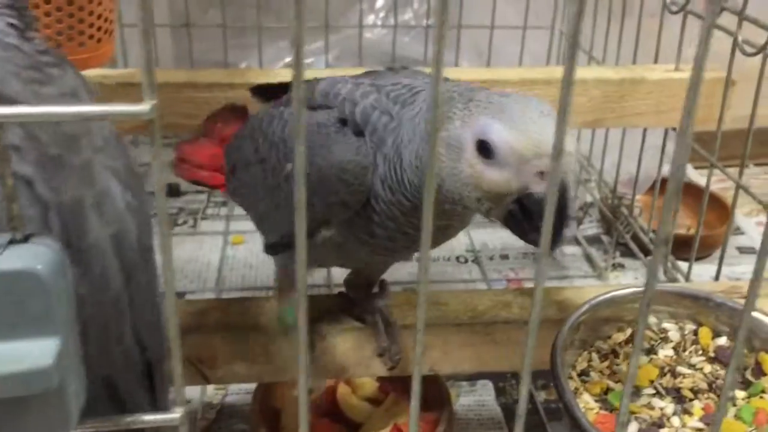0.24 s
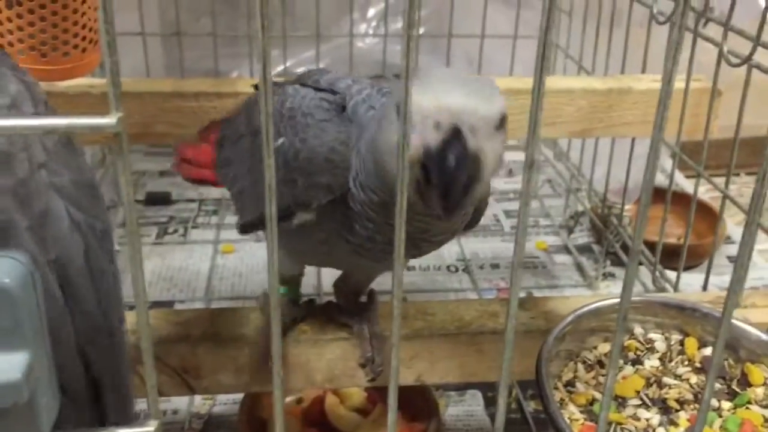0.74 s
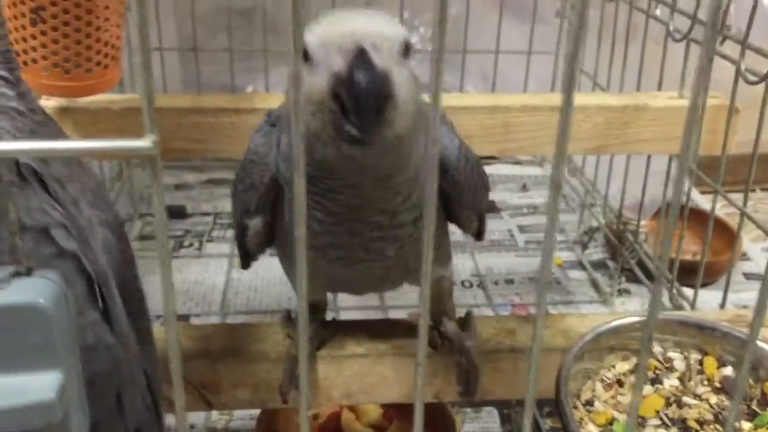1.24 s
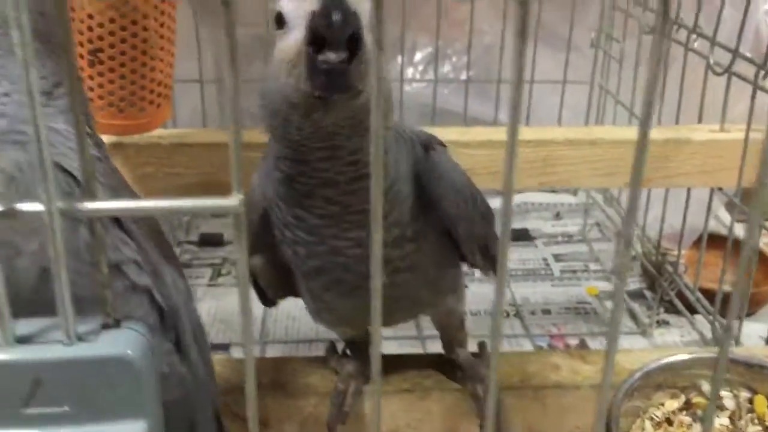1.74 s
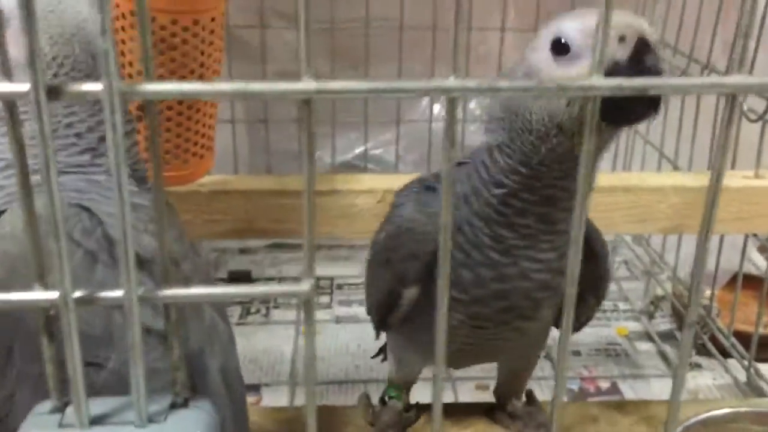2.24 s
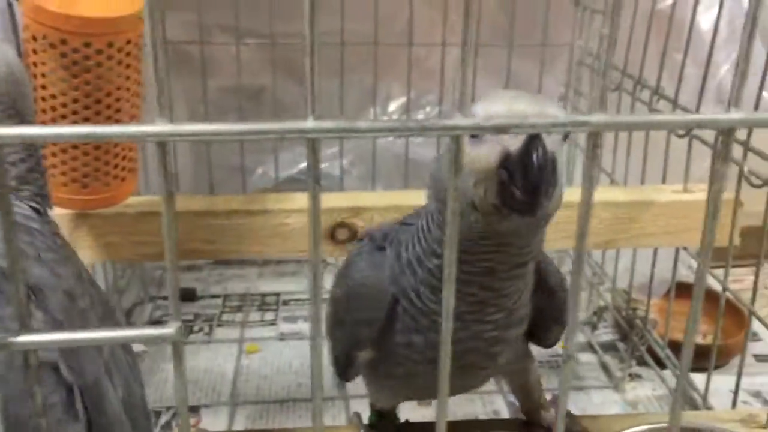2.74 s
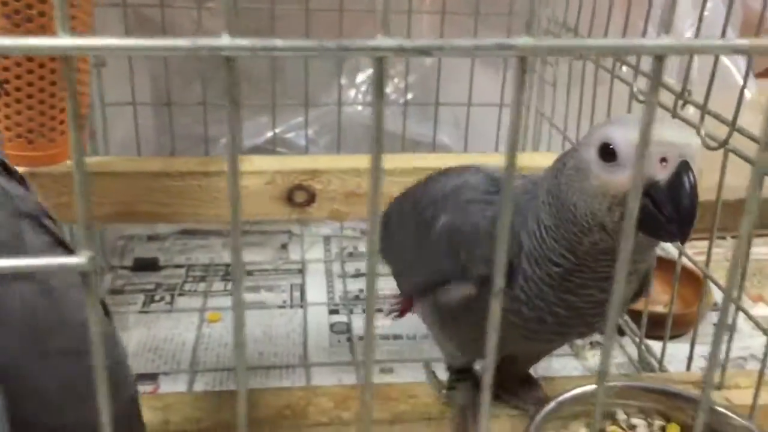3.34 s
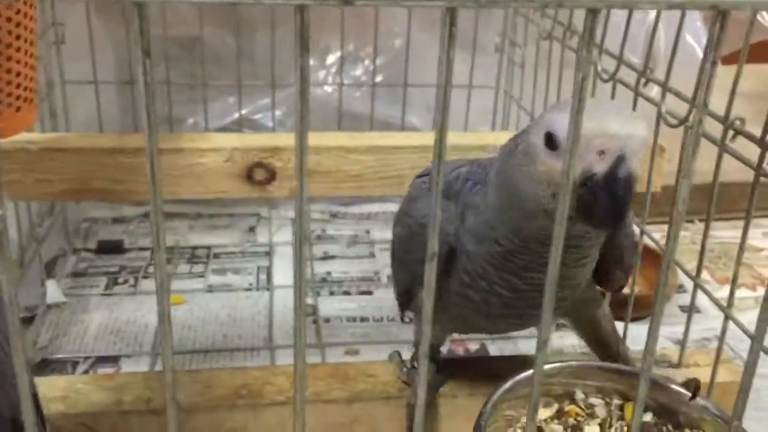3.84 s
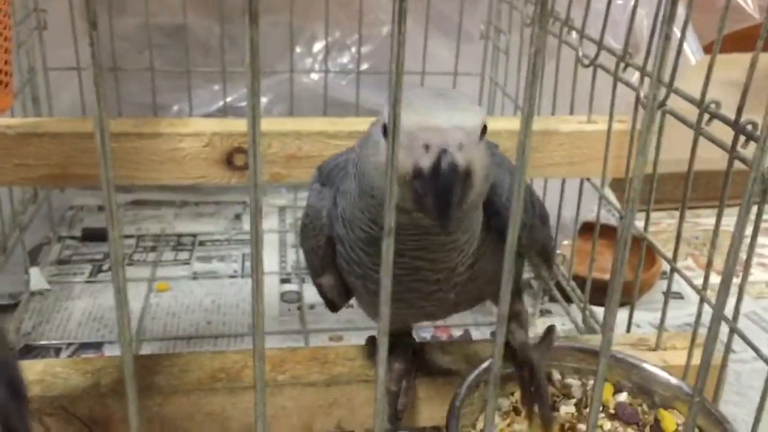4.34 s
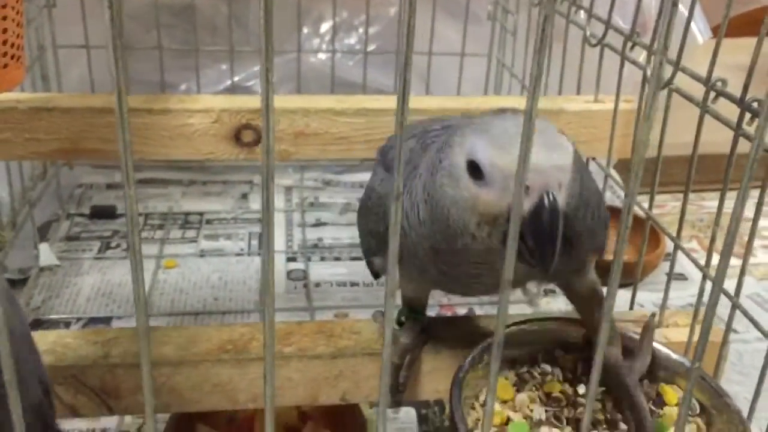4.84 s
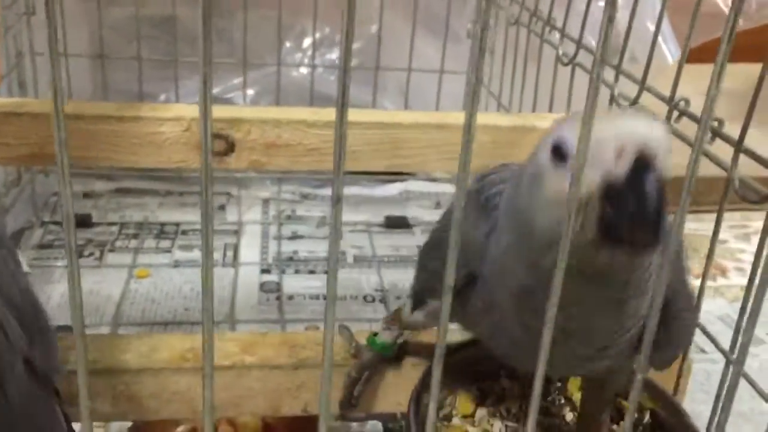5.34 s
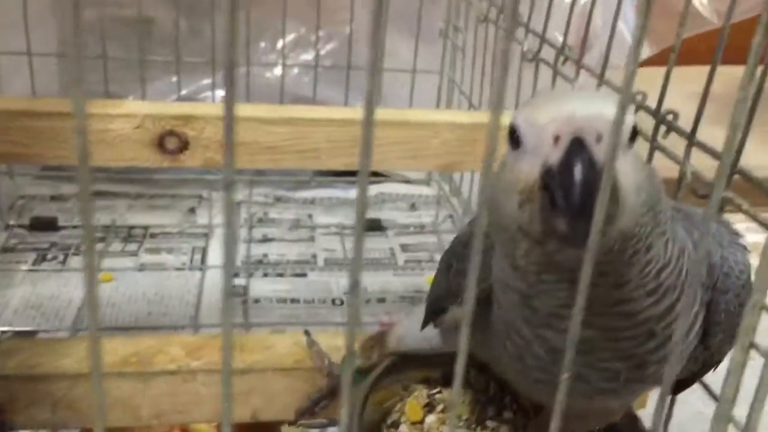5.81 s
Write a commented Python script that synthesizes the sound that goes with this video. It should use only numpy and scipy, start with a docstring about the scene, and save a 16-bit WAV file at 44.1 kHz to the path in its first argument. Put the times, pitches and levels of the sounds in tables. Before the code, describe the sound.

Parrots clamber about a wire cage, close to the microphone in a small room. Beaks and claws tap and scrape the bars irregularly, with a brief wire twang early on and soft thuds of feet on a wooden perch. Midway, one bird gives a short falling chirp. Sharper clicks follow, then a clink on a steel seed bowl, a few dull knocks very near and some squeaky scratching.

```python
"""Young parrots clamber about a wire cage, close by in a small room.
Beaks and claws excite the bars by impact (taps) and by stick-slip friction (scrapes, squeaks, twangs).
Feet thud on a wooden perch and clink a steel seed bowl; a few dull knocks land very near.
One bird gives a short falling chirp, a harmonic source shaped by the resonances of its throat.
The room adds a brief reverberation over a low rumble and faint hiss."""
import sys
import numpy as np
from scipy import signal
from scipy.fft import rfft, irfft, next_fast_len
from scipy.io import wavfile
from scipy.ndimage import uniform_filter1d

SR = 44100
rng = np.random.default_rng(int(sys.argv[2]) if len(sys.argv) > 2 else 0)


def master(y):
    """Save y as 16-bit WAV."""
    cut = np.clip(np.atleast_2d(y).T, -1, 1)
    pcm = np.round(cut * 32767)  # scale
    wavfile.write(sys.argv[1], SR, pcm.astype(np.int16))


N = 267687
TIME = np.arange(N) / SR
AGE = TIME[:32768]  # seconds since the onset of one event


def undb(db):
    """Decibels to amplitude ratio."""
    return 10 ** (np.asarray(db) / 20)


def unit_rms(x):
    """Normalise to rms 1."""
    return x / np.sqrt(np.mean(x ** 2))


def unit_energy(x):
    """Normalise to total energy 1."""
    return x / np.linalg.norm(x)


def at_level(x, level_db):
    """Set the rms level of the loudest three milliseconds."""
    return x * undb(level_db) / np.sqrt(uniform_filter1d(x ** 2, 132, mode="constant").max())


def add(out, start_s, x):
    """Superposition: sum a sound into the mix at its onset."""
    i = max(int(start_s * SR), 0)
    out[i:i + len(x)] += x[:N - i]


def decay(t60_s):
    """Exponential damping: 60 dB down after t60_s."""
    return np.exp(-np.log(1000) * AGE / max(t60_s, 1 / SR))


def colour(x, points):
    """Minimum-phase filter through (frequency_hz, gain_db) points, by folding the cepstrum."""
    hz, db = np.transpose(points)
    n = 2 * next_fast_len(len(x))
    f = np.maximum(np.fft.rfftfreq(n, 1 / SR), 1)
    cepstrum = irfft(np.log(undb(np.interp(np.log(f), np.log(hz), db))))
    cepstrum[1:n // 2] *= 2
    cepstrum[n // 2 + 1:] = 0
    return irfft(rfft(x, n) * np.exp(rfft(cepstrum)))[:len(x)]


def resonate(x, hz, q):
    """Second-order resonance of bandwidth hz / q."""
    return signal.lfilter(*signal.iirpeak(hz, q, fs=SR), x)


def ring(modes, scatter_db):
    """Free vibration as a sum of damped modes; each contact point weights them differently."""
    return sum(undb(db + scatter_db * rng.standard_normal()) * decay(t60_s)
               * np.sin(2 * np.pi * (hz * AGE + rng.random())) for hz, db, t60_s in modes)


def impact(t60_s, rattle):
    """Impulsive excitation followed by a dense, decaying rattle."""
    return (AGE == 0) + rattle * unit_energy(rng.standard_normal(len(AGE)) * decay(t60_s))


def chatter(t60_s, rattle, onset_t60_s):
    """Two-stage decay: a hard contact chatters briefly, then the bars rattle on."""
    first, after = rng.standard_normal((2, len(AGE)))
    return unit_energy(first * decay(onset_t60_s)) + rattle * unit_energy(after * decay(t60_s))


def stroke(length_s, attack_s):
    """Contact pressure of a slide: grip, easing off, release."""
    return (1 - np.exp(-(AGE / attack_s) ** 2)) * np.exp(-(AGE / length_s) ** 2)


def disperse(x, lag_s):
    """Dispersion of bending waves: the highs arrive first; lag_s is the group delay at 1 kHz."""
    f = np.fft.rfftfreq(2 * len(x), 1 / SR)
    phase = 4 * np.pi * lag_s * np.sqrt(1000 * f)
    return irfft(rfft(x, 2 * len(x)) * np.exp(-1j * phase))[:len(x)]


def tilt(hardness_db):
    """Spectral tilt (bass_db, treble_db): harder contacts trade bass for treble."""
    return 1.5 - hardness_db, hardness_db


def radiate(x, bass_db, treble_db):
    """Radiation efficiency: thin wire gives off little bass."""
    return colour(x, [(100, bass_db - 16), (400, bass_db - 22), (800, bass_db - 10),
                      (1250, bass_db + 0.5), (1900, bass_db / 2), (2700, 0), (4500, 0.0048),
                      (8500, treble_db + 2.5), (14500, 1.54 * treble_db - 4)])


# background noise spectrum: frequency_hz, relative_density_db
AIR_SPECTRUM = [(25, -34), (38, -16), (56, 2.5), (76, -9.5), (100, -2.5), (140, -10), (200, -15.5),
                (400, -24.5), (900, -27), (2500, -30.5), (7000, -35), (15500, -40)]
def air():
    """Steady broadband noise: the low rumble of the house and a faint hiss."""
    return unit_rms(colour(rng.standard_normal(N), AIR_SPECTRUM)) * undb(-65.5)


# modes of the free cage bars: frequency_hz, gain_db, t60_s
BAR_MODES = [(1310, -8.5, 0.35), (1522, -5, 0.11), (1861, -12.5, 0.075), (2426, -2, 0.17), (2910, -7, 0.11),
             (3670, 4, 0.1), (4100, 7, 0.028), (4530, -8, 0.085), (5610, 4, 0.073), (6740, 9, 0.019),
             (8350, -19, 0.11), (8810, 3.5, 0.055), (9930, -19.5, 0.14), (12200, 2.5, 0.15),
             (13700, -14.5, .09)]
def with_bar_ring(x, ring_db, scatter_db, grip_t60_s):
    """Modal response: a contact plus the ringing it excites, damped by the bird's grip."""
    response = ring(BAR_MODES, scatter_db) * decay(grip_t60_s)
    ringing = signal.fftconvolve(x, response)[:len(x)]
    return x + undb(ring_db) * np.linalg.norm(x) * unit_energy(ringing)


# claws and beaks sliding on wire and wood: start_s, length_s, level_db, hardness_db
SCRAPES = [(.002, 0.0083, -47, -1.5), (0.311, 0.029, -64, -2.5), (.622, 0.04, -50.5, -3.5),
           (0.852, 0.058, -38, -0.5), (.936, 0.03, -43, 8.5), (1.1, .12, -43.5, -5.5),
           (1.382, 0.11, -52.5, -3.5), (1.453, 0.054, -41.5, -11.5), (1.76, 0.019, -55.5, -0.5),
           (2.046, 0.012, -64.5, 1), (2.573, 0.023, -48.5, -6), (2.624, 0.025, -48, -0.5),
           (2.766, .028, -49, 2), (3.309, 0.044, -52.5, -7), (3.33, 0.031, -46, -2.5),
           (3.385, 0.041, -39, -3), (3.472, 0.038, -44.5, 0.5), (3.652, 0.017, -43.5, 4),
           (4.132, 0.028, -52, -2.5), (4.417, 0.08, -48, 0.5), (4.477, 0.012, -44, 4.5),
           (4.885, .11, -50.5, -16), (5.029, 0.042, -42.5, -1), (5.093, 0.26, -48, -2.5),
           (5.2152, 0.027, -36, -0.5), (5.499, 0.017, -49.5, -4), (5.514, 0.065, -45, -3),
           (5.556, 0.3, -53.5, -5.5), (5.712, 0.03, -43, 1.5), (5.7383, 0.057, -34.5, 1.5),
           (5.854, 0.065, -45, -1), (5.886, 0.034, -41, 1.5)]
def scrapes(slips_per_s=6000, slip_scatter_db=4, jerks_per_s=130, jerk_db=3):
    """Stick-slip friction: a claw moves in jerks, its tiny slips exciting the spot beneath it."""
    out = np.zeros(N)
    for start_s, length_s, level_db, hardness_db in SCRAPES:
        attack_s = 0.0024 * 2 ** ((-43.5 - level_db) / 12)  # firmer slides bite faster
        bass_db, treble_db = tilt(hardness_db)
        push, spread = rng.standard_normal((2, len(AGE)))
        slips = (rng.random(len(AGE)) < slips_per_s / SR) * push * undb(slip_scatter_db * spread)
        spot = impact(0.008, rattle=0.6)
        jerks = unit_rms(uniform_filter1d(rng.standard_normal(len(AGE)), int(SR / jerks_per_s)))
        force = slips * undb(jerk_db * jerks) * stroke(length_s, attack_s)
        friction = signal.fftconvolve(force, spot)[:len(AGE)]
        vibration = with_bar_ring(friction, ring_db=-12, scatter_db=2, grip_t60_s=0.035)
        # the wooden perch answers mainly the duller slides
        wood = undb(-17 + bass_db - treble_db) * resonate(vibration, 620, q=0.18)
        add(out, start_s, at_level(radiate(vibration, bass_db, treble_db) + wood, level_db))
    return out


def claw_ticks(ticks_per_s, loudest_db):
    """Faint impacts at random times as the birds shift their weight."""
    out = np.zeros(N)
    for when, faintness in rng.random((int(ticks_per_s * N / SR), 2)):
        tick = radiate(chatter(0.04, rattle=1.5, onset_t60_s=0.008), bass_db=-4, treble_db=-2)
        add(out, when * N / SR, at_level(tick, loudest_db - 9 * faintness))
    return out


# claws squeaking on wire: start_s, length_s, level_db, pitch_hz
SQUEAKS = [(0.324, 0.021, -61.5, 3340), (1.396, 0.045, -65, 3900), (1.397, 0.029, -54, 5600),
           (2.775, 0.021, -46.5, 4100), (2.777, 0.02, -44.5, 5600), (3.6343, 0.0065, -35, 8950),
           (4.087, .012, -59, 1700), (5.515, 0.013, -48, 6800), (5.73, .03, -40, 6800),
           (5.856, 0.07, -47.5, 2140)]
def squeaks():
    """Friction-excited resonance: the slips lock onto one frequency for a moment."""
    out = np.zeros(N)
    for start_s, length_s, level_db, pitch_hz in SQUEAKS:
        friction = rng.standard_normal(len(AGE)) * stroke(length_s, attack_s=length_s / 3)
        squeak = resonate(resonate(friction, pitch_hz, q=6.5), pitch_hz, q=6.5)
        add(out, start_s, at_level(squeak, level_db))
    return out


def damped_body(hz, q, t60_cycles, rattle):
    """Heavy damping: a soft blow excites one broad resonance, with little far below or above it."""
    blow = disperse(impact(t60_cycles / hz, rattle), lag_s=0.000732)
    band = [(hz / 5, -22), (hz / 2, -1), (hz, 0), (1.62 * hz, -3), (2.67 * hz, -17), (9 * hz, -26)]
    return colour(resonate(blow, hz, q), band)


# dull knocks very near the listener, and a few broad thuds of feet on the perch: start_s, level_db, centre_hz,
# quality_factor
KNOCKS = [(.489, -53.5, 686, 1.1), (.501, -50, 556, 0.87), (.607, -46, 400, 0.22), (4.877, -51, 300, .8),
          (5.4293, -27, 1140, 0.17), (5.4318, -28, 1810, 0.37), (5.4591, -23, 1330, 0.32),
          (5.460, -29, 504, 0.26), (5.5512, -33, 930, 2.9), (5.6328, -45.5, 1780, 0.24),
          (5.663, -52, 1600, 0.37), (5.679, -49, 1500, 0.69), (5.6846, -43, 2050, 0.24),
          (5.6935, -54, 1100, .7)]
def knocks():
    """Impulse response of a heavily damped body: the lower its Q, the less pitch is heard."""
    out = np.zeros(N)
    for start_s, level_db, centre_hz, q in KNOCKS:
        add(out, start_s, at_level(damped_body(centre_hz, q, t60_cycles=22, rattle=0.72), level_db))
    return out


# beaks and claws striking the bars: start_s, level_db, hardness_db, spot_hz, rattle_t60_s
TAPS = [(0.589, -49, -8.5, 4500, 0.084), (0.6065, -29, -9.5, 3280, 0.015), (.608, -32.5, -9, 4480, 0.019),
        (0.8014, -52.5, 0.5, 4300, 0.06), (0.8434, -44, -2, 3700, 0.018), (2.134, -46, 5.5, 3000, 0.012),
        (2.563, -39.5, -12, 2900, 0.021), (3.333, -35, 3, 3500, 0.065), (3.3853, -36, 9, 8500, 0.039),
        (3.4154, -35.5, -8, 2100, 0.027), (3.4881, -30.5, 1.5, 3950, 0.012),
        (3.6146, -41, 2.5, 7000, 0.027), (3.6473, -24.5, 1.5, 4800, 0.021), (3.659, -31, -2.5, 8600, 0.018),
        (3.75, -37, -9, 5700, 0.014), (3.92, -53, 12, 9000, 0.025), (4.176, -28, -1.5, 11300, 0.011),
        (4.1794, -23.5, 8.5, 8500, 0.02), (4.186, -32, 3.5, 5750, 0.033), (4.4926, -30.5, 11, 7000, 0.013),
        (4.877, -48, -1.5, 1300, 0.04), (5.1276, -39.5, 0, 4000, 0.0087), (5.3473, -49.5, 18, 9000, .013),
        (5.3703, -52.5, -9.5, 6800, 0.042), (5.52, -38, -3.5, 6800, 0.047), (5.5917, -44, -4, 3300, 0.018),
        (5.7417, -35, 7.5, 6860, .03)]
def taps(usual_rattle_s=0.022):
    """Impacts launch bending waves in the bars; returns the direct sound and the feed to the room."""
    direct, to_room = np.zeros((2, N))
    for start_s, level_db, hardness_db, spot_hz, rattle_t60_s in TAPS:
        rattle_ratio = rattle_t60_s / usual_rattle_s
        onset_t60_s = 0.0051 * np.sqrt(rattle_ratio)  # drier taps are sharper
        strike = chatter(rattle_t60_s, rattle=1, onset_t60_s=onset_t60_s)
        bars = with_bar_ring(strike, ring_db=-13.5, scatter_db=3, grip_t60_s=0.35)
        # softer contacts bring out the resonance of the struck spot
        spot = undb(5.5 - 0.94 * hardness_db) * resonate(bars, spot_hz, q=9.3)
        waves = disperse(bars + spot, lag_s=0.000807)
        tap = at_level(radiate(waves, *tilt(hardness_db)), level_db)
        add(direct, start_s, tap)
        # a longer rattle shakes more of the cage into the room
        add(to_room, start_s, tap * undb(-8 + 6 * np.log2(rattle_ratio)))
    return direct, to_room


# modes of a wire, before transposing to each pitch: frequency_hz, gain_db, t60_s
WIRE_MODES = [(1912, -1, 0.93), (1992, -3.5, 0.6), (3970, -31, .25), (5260, -6, 0.13), (5470, -1, 0.077),
              (5680, -4, .09), (9220, -9.5, 0.22), (11420, -14, 0.21)]
# a wire plucked or rubbed until it sings: start_s, drive_s, level_db, pitch_hz
TWANGS = [(0.603, 0.015, -49, 1887), (0.61, 0.015, -47.5, 1548), (0.856, 0.011, -31, 1912)]
def twangs():
    """Forced, then free vibration: a wire swells while driven and rings on faintly."""
    out = np.zeros(N)
    for start_s, drive_s, level_db, pitch_hz in TWANGS:
        modes = [(hz * pitch_hz / WIRE_MODES[0][0], db, t60_s) for hz, db, t60_s in WIRE_MODES]
        progress = np.minimum(AGE / drive_s, 1)
        driven, free = np.sin(np.pi * progress), 0.065 * progress
        add(out, start_s, at_level(ring(modes, scatter_db=1) * (driven + free), level_db))
    return out


# feet landing on the perch and the bowl: start_s, level_db, centre_hz
THUDS = [(0.789, -58.5, 357), (1.053, -58, 395), (1.104, -43.5, 430), (1.122, -43, 149), (1.46, -50.5, 228),
         (1.519, -53.5, 191), (2.553, -55, 414), (3.415, -53, 362), (3.765, -45.5, 1244),
         (4.959, -54.5, 111), (5.372, -50, 318), (5.461, -44.5, 402), (5.68, -50, 597)]
def thuds():
    """Soft impact: a landing foot excites a broad, quickly damped resonance."""
    out = np.zeros(N)
    for start_s, level_db, centre_hz in THUDS:
        thud = damped_body(centre_hz, q=1.4, t60_cycles=26, rattle=1.66)
        add(out, start_s, at_level(thud, level_db))
    return out


# response of the bird's throat: frequency_hz, gain_db
THROAT_RESPONSE = [(1250, -4), (1650, 8), (2100, -17), (2750, -11), (3250, -10.5), (3650, -39),
                   (4200, -15.5), (4800, -21), (5400, -37), (6500, -38), (7200, -40), (8100, -37.5),
                   (10000, -43), (13000, -27)]
# envelope of the chirp: time_s, gain_db
CHIRP_ENVELOPE = [(3.014, -78), (3.03, -57), (3.074, -47), (3.088, -32), (3.101, -46), (3.123, -35),
                  (3.14, -48.5), (3.16, -48)]
def chirp(whistle_hz=1615, fallen_hz=1330, fall_at_s=3.107, fall_s=0.015):
    """Source and filter: a hoarse voice clears to a whistle, then drops in pitch and roughens."""
    times_s, gains_db = np.transpose(CHIRP_ENVELOPE)
    envelope = undb(np.interp(TIME, times_s, gains_db)) * (TIME > times_s[0]) * (TIME < times_s[-1])
    fall = (1 + np.tanh((TIME - fall_at_s) / fall_s)) / 2
    pitch_hz = whistle_hz + (fallen_hz - whistle_hz) * fall
    clearing_db = 22.5 - 565 * np.maximum(TIME - times_s[0], 0)
    hoarse_db = np.maximum(clearing_db, -17 + 7.5 * fall)
    hoarseness = undb(hoarse_db)
    # unsteady pitch smears the upper partials most
    flutter = unit_rms(uniform_filter1d(rng.standard_normal(N), size=60))
    phase = 2 * np.pi * np.cumsum(pitch_hz * (1 + 0.08 * hoarseness * flutter)) / SR
    partials = np.sin(np.outer(np.arange(1, 7), phase))
    overtones = 2.1 * undb(0.3 * hoarse_db) * partials[1:].sum(axis=0)
    breath = 0.5 * hoarseness * rng.standard_normal(N)
    voice = colour(partials[0] + overtones + breath, THROAT_RESPONSE)
    rasp = unit_rms(resonate(resonate(rng.standard_normal(N), 2870, q=6.1), 2400, q=9.5))
    return (0.82 * voice + 0.33 * hoarseness * rasp) * envelope


# modes of the steel seed bowl: frequency_hz, gain_db, t60_s
BOWL_MODES = [(996, -9, .35), (1422, -14, 1), (2770, -4.5, .12), (3316, -2.5, 0.11), (3436, -7, 1),
              (4274, -8, 0.27), (5100, 0.5, .3), (5114, -11, 0.23), (5520, 1, 0.12), (6560, -16, .14),
              (7400, -17, .16), (8900, -8, 0.13), (9297, -1.5, .15)]
# a claw catches the rim of the bowl: start_s, level_db
CLINKS = [(5.034, -62), (5.2187, -37), (5.518, -53)]
def clinks():
    """Inharmonic modes of a struck shell: the level drops quickly, then the bowl rings on."""
    out = np.zeros(N)
    for start_s, level_db in CLINKS:
        add(out, start_s, at_level(ring(BOWL_MODES, scatter_db=3) * (decay(0.053) + 0.44), level_db))
    return out


# reverberation time of the room: frequency_hz, t60_s
ROOM_DECAY = [(150, 0.48), (500, 0.46), (1500, 0.38), (4000, 0.26), (9000, 0.18), (15000, 0.19)]
def room(x):
    """Diffuse reverberation: the dense reflections of a small room, the treble dying first."""
    hz, t60s = np.transpose(ROOM_DECAY)
    noise = rfft(rng.standard_normal(len(AGE)))
    f = np.fft.rfftfreq(len(AGE), 1 / SR)
    bands = [irfft(noise * np.interp(f, hz, weights)) for weights in np.eye(len(hz))]
    tail = sum(band * decay(t60_s) for band, t60_s in zip(bands, t60s))
    build_up = 1 - np.exp(-(AGE / 0.0012) ** 2)
    return signal.fftconvolve(x, unit_energy(tail * build_up))[:N]


def scene():
    """Direct plus reverberant field: near contacts are dry, farther ones carry more of the room."""
    tap, tap_room = taps()
    scrape = scrapes() + claw_ticks(ticks_per_s=6, loudest_db=-60)
    squeak, metal, call = squeaks(), clinks() + twangs(), chirp()
    knock, thud = knocks(), thuds()
    # directivity: the beak beams its overtones away from the listener, into the room
    call_room = colour(call, [(1500, -4.5), (3000, -1.5), (4500, 11.5), (9000, 14.5)])
    to_room = (tap_room + call_room + undb(-5) * scrape + undb(-17) * squeak + undb(3.5) * metal
               + undb(-16) * knock + undb(-6) * thud)
    direct = tap + scrape + squeak + metal + call + knock + thud
    return (direct + room(to_room) + air())[None]


def record(dry):
    """Band limiting: a steep low-pass filter cuts the treble above 15.4 kHz."""
    return signal.sosfilt(signal.ellip(10, 0.2, 70, 15400, fs=SR, output="sos"), dry)


dry = scene()
out = record(dry)
master(out)
```